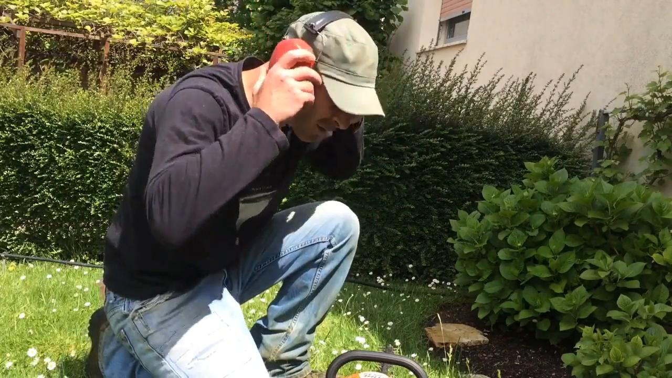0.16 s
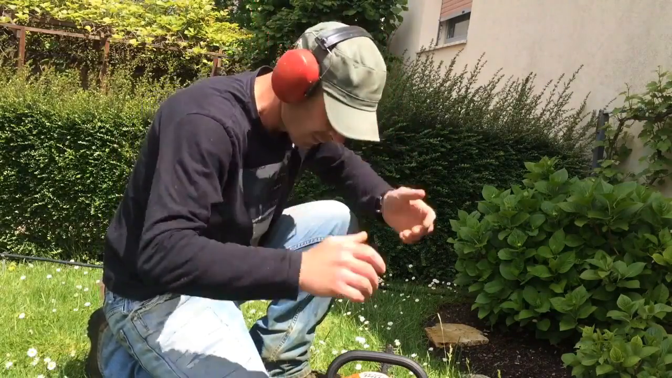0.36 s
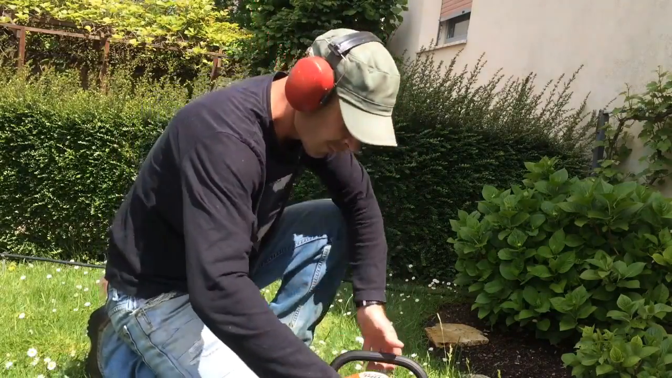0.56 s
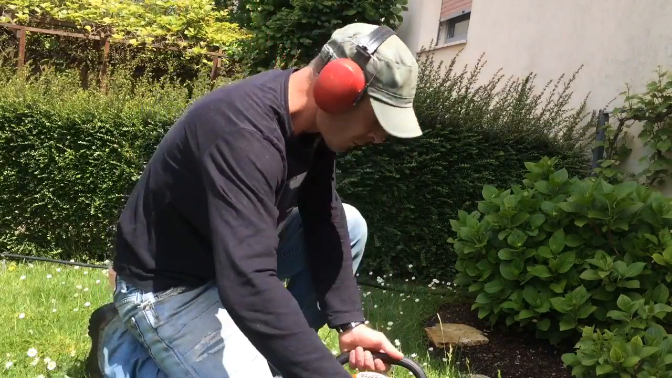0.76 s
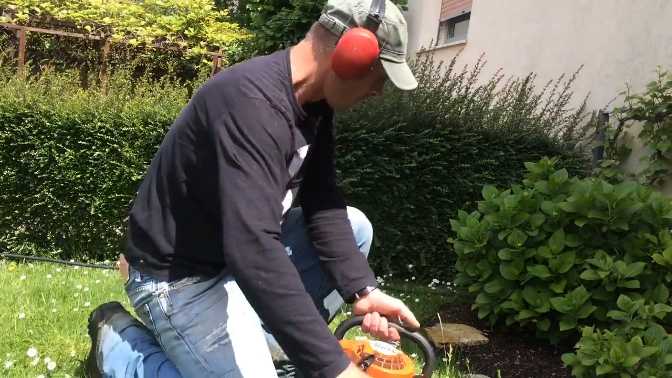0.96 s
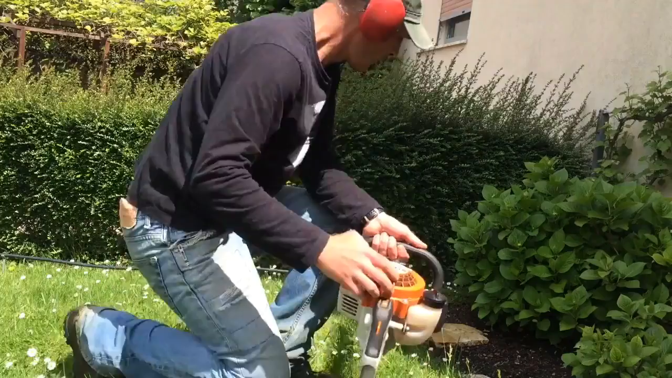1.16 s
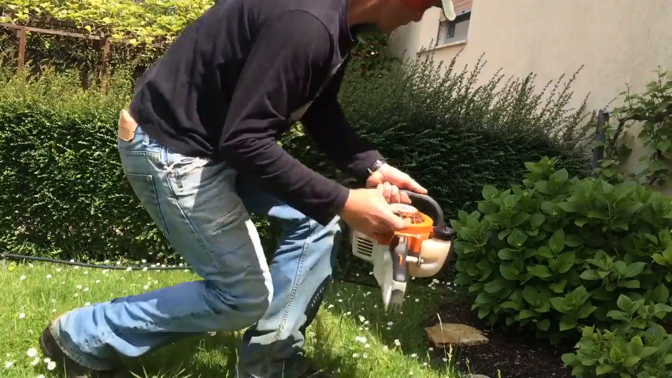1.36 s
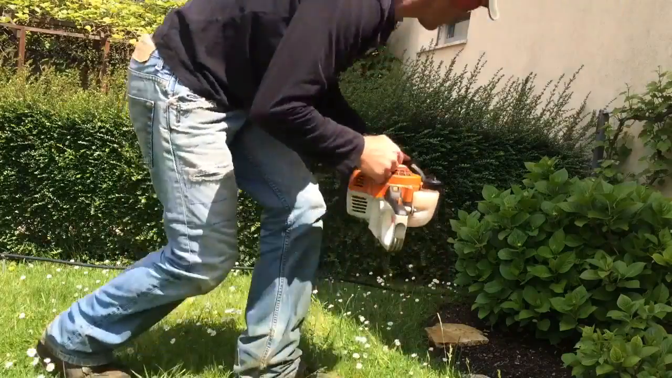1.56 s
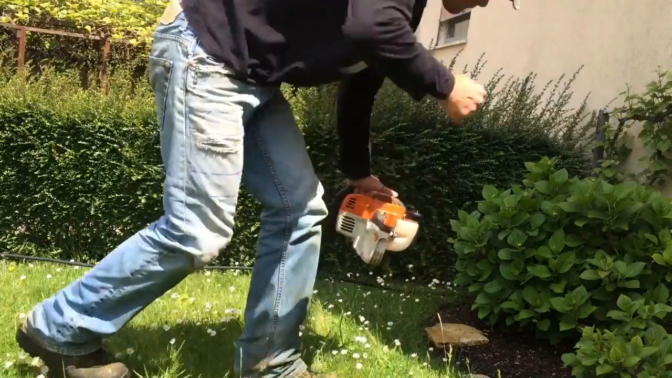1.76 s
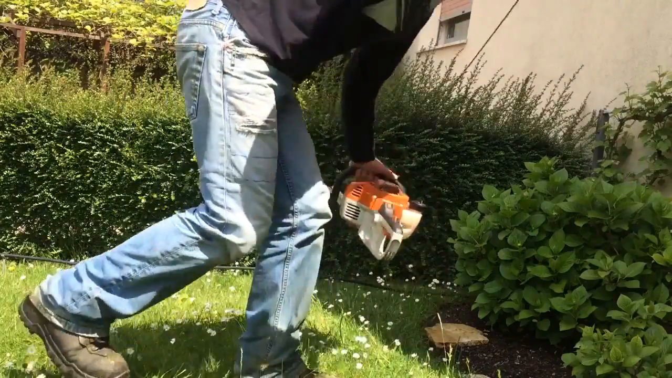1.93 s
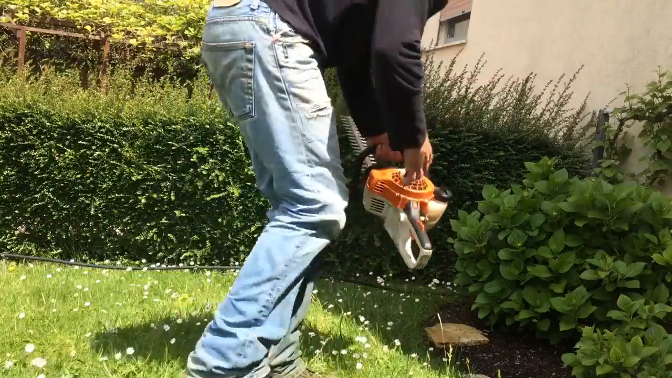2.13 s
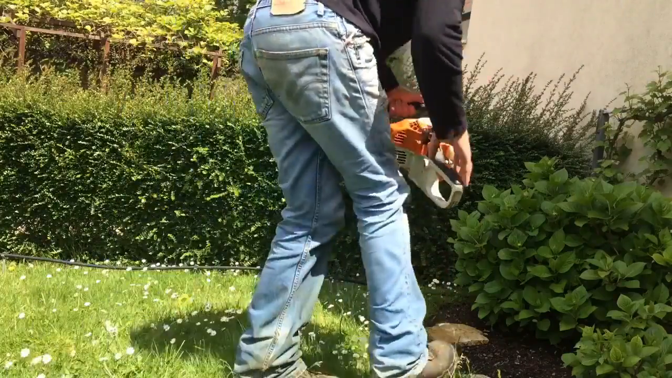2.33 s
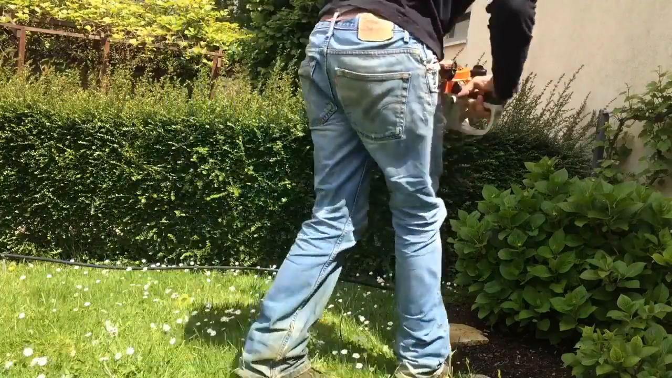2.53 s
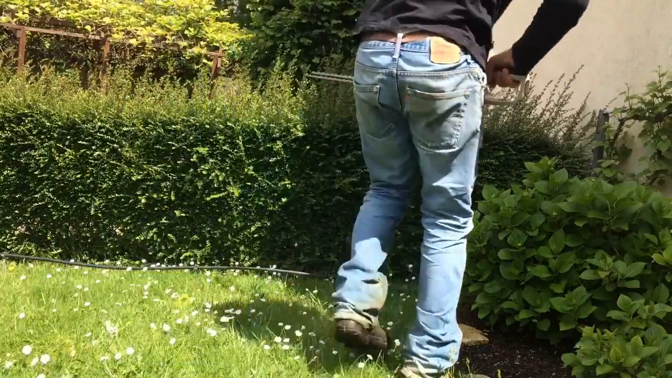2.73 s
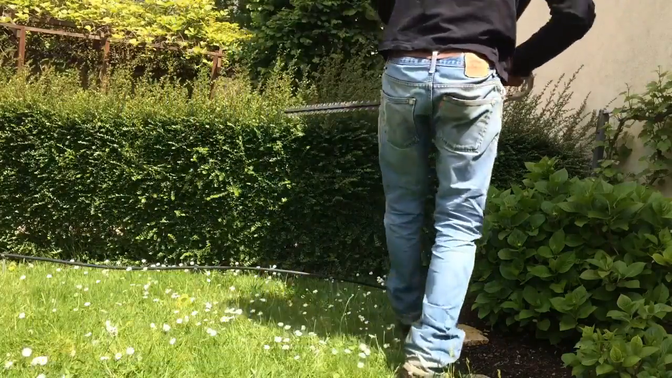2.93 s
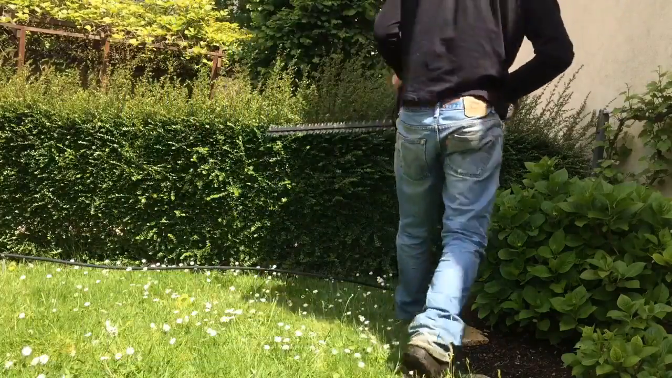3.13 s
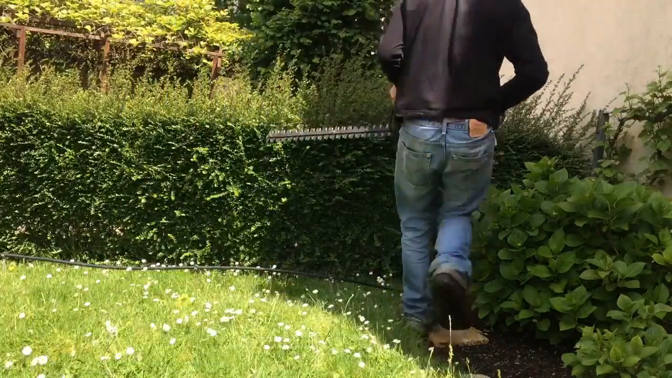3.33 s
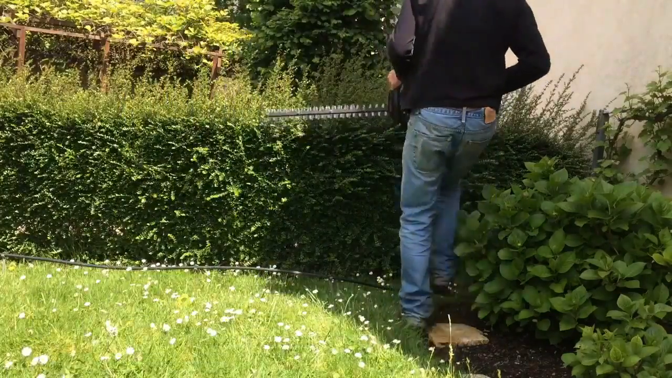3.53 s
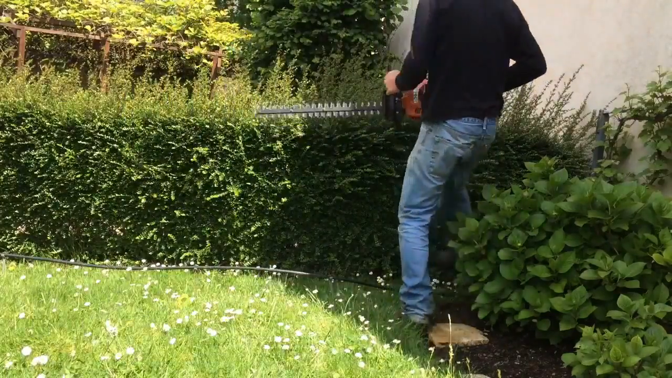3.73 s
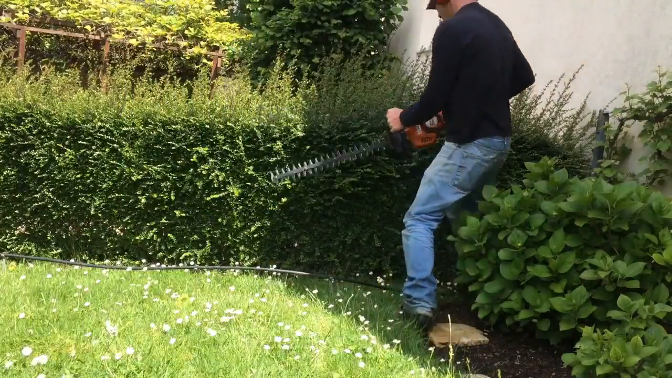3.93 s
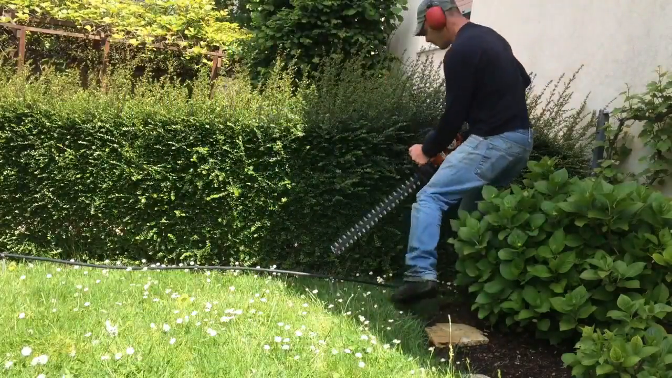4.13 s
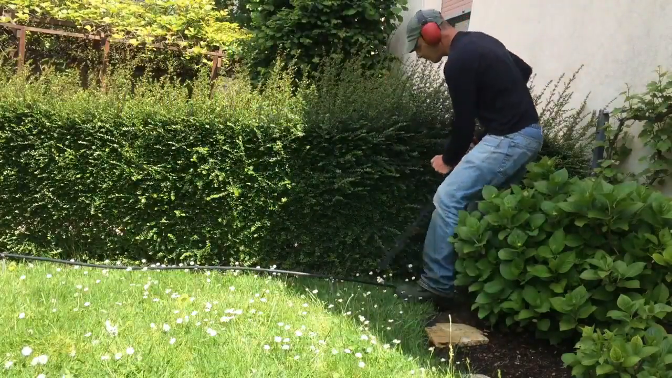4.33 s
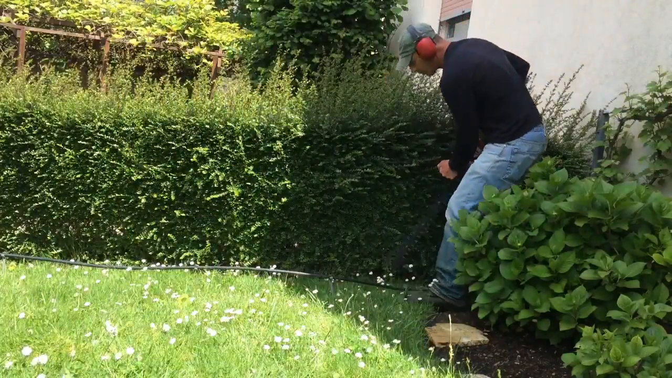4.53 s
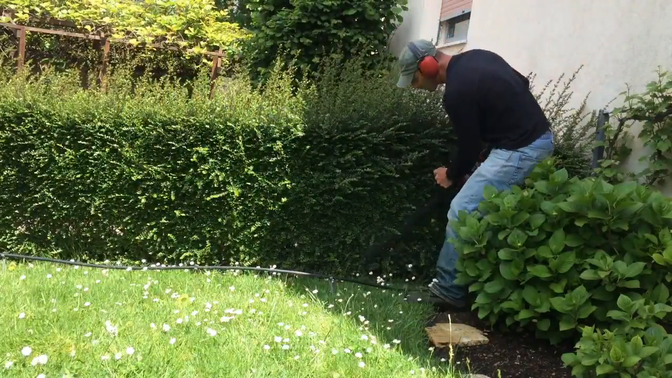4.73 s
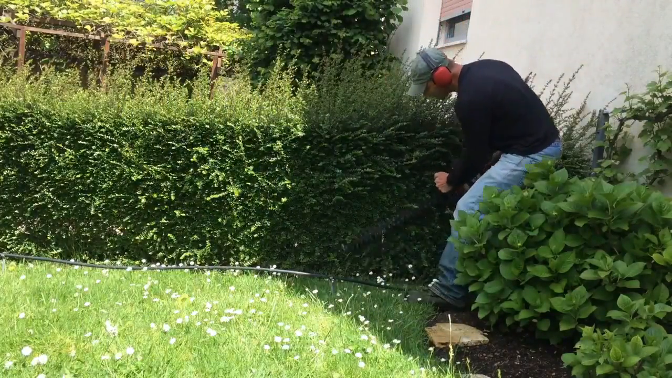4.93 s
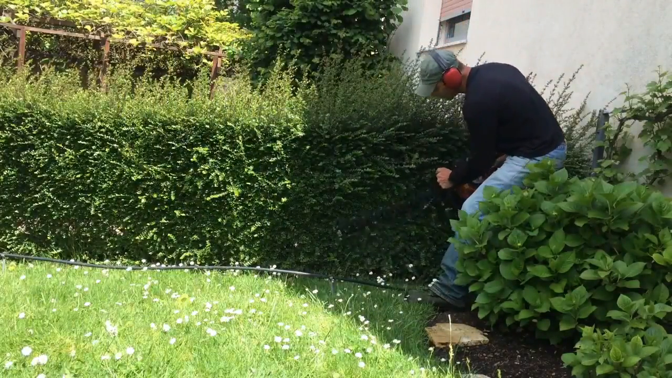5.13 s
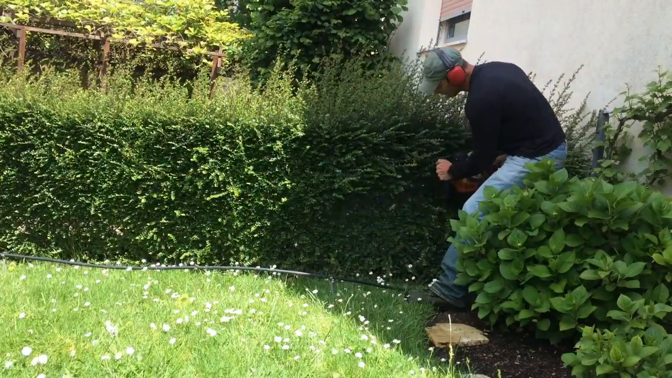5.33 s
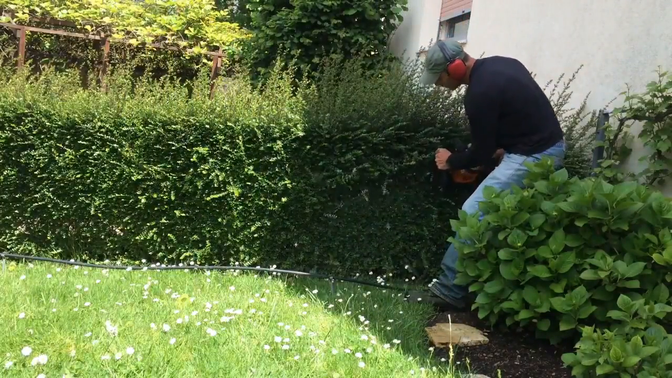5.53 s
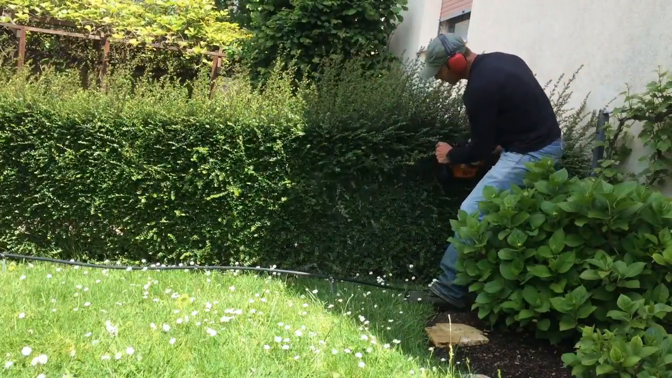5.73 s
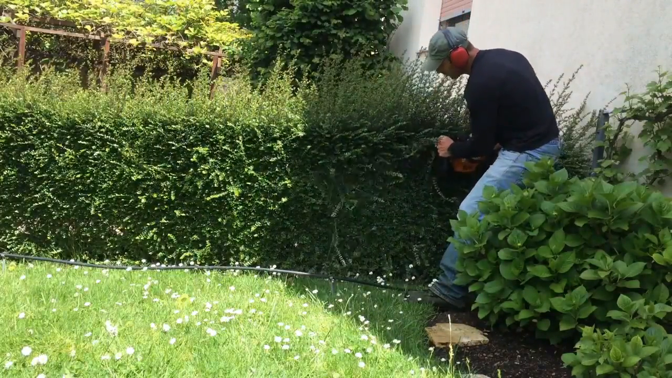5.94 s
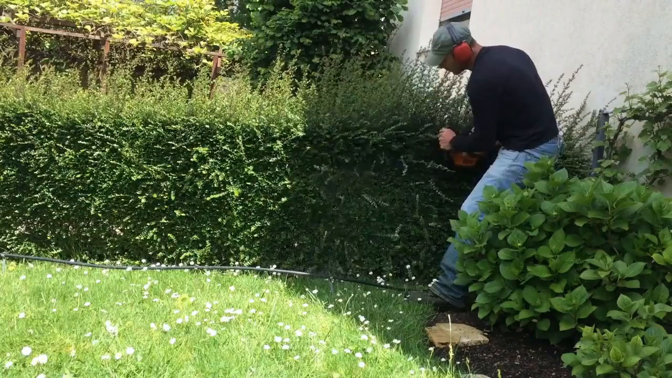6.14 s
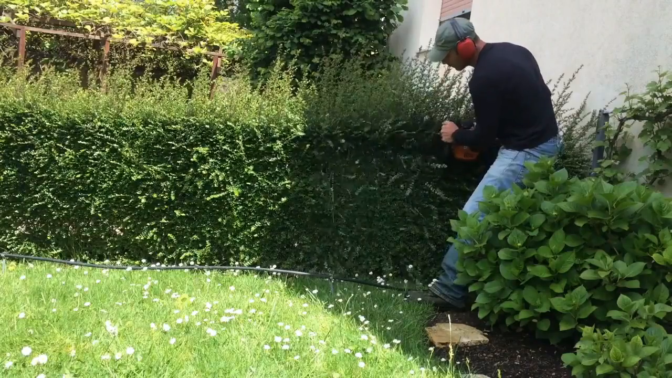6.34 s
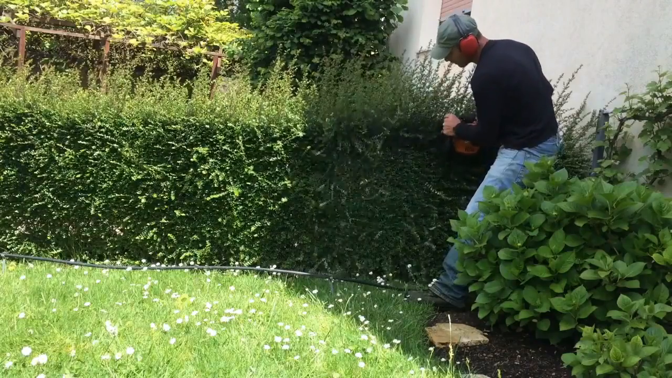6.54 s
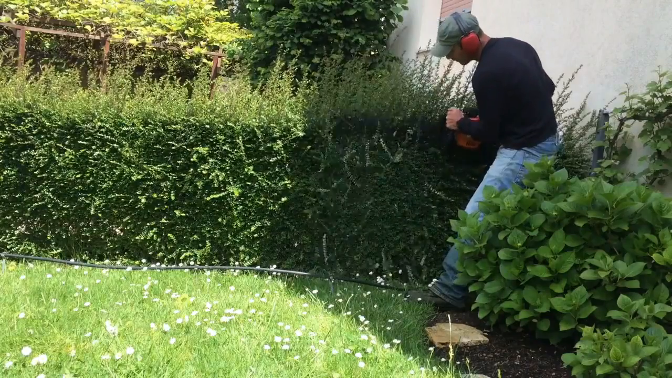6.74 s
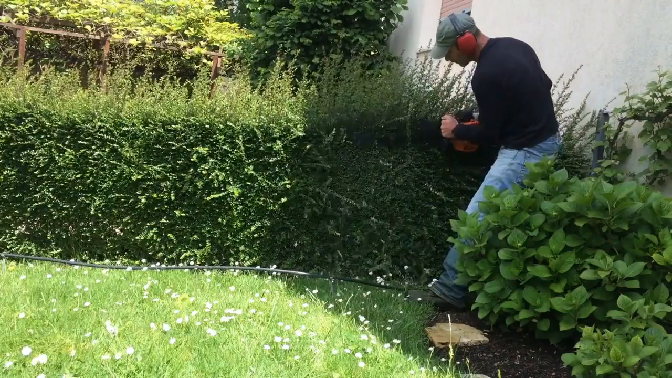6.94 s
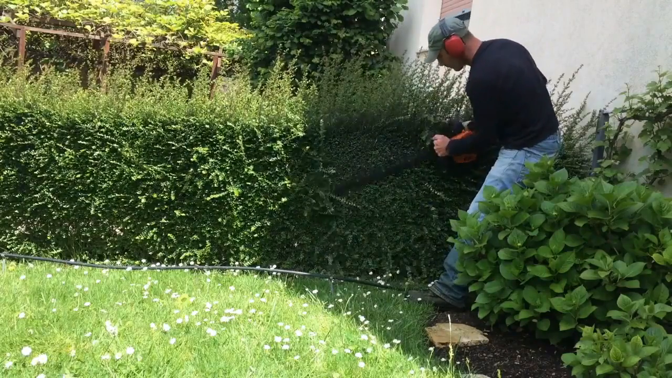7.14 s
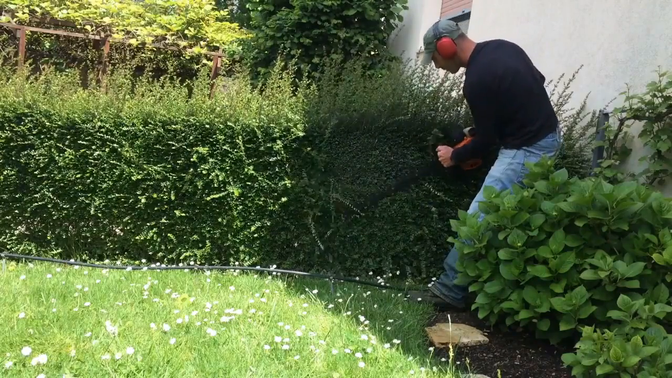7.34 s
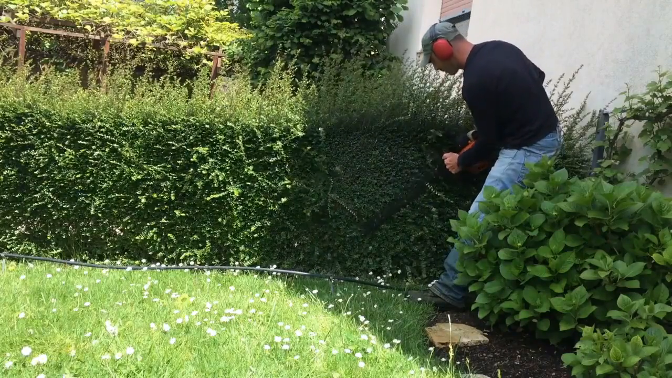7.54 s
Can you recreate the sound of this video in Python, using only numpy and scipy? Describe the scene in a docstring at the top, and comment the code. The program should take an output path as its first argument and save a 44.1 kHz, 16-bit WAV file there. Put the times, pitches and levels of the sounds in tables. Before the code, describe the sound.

The sound opens in a quiet garden with a faint low rumble. From about 0.7 seconds, clothes and grass rustle softly and a petrol hedge trimmer gives light knocks as it is picked up nearby, with a sharper one at 1.3 seconds. Around 1.8 seconds one quick, clattering pull starts the two-stroke engine. Several loud metallic clanks follow until 2.4 seconds. The engine idles lumpily, with low muffler thumps, uneven pops and rattling steel blades, and there is another knock at 4.4 seconds. At 4.5 seconds the throttle opens and the pitch climbs fast, reaching a loud, rasping drone just after 5 seconds. The blades clatter and sizzle along the hedge, with a thin metallic ring growing over them. At about 7 seconds the engine briefly drops in pitch and level, recovers by 7.4 seconds, and is still at full speed when the sound ends at 7.6 seconds.

```python
"""A two-stroke petrol hedge trimmer is picked up in a garden and started with one pull.
Its housing knocks, then it idles lumpily: each crank turn thumps the muffler and rattles the steel
blades, and about every fourth fires hard. It revs to full throttle, the crank's harmonics sweeping
through muffler and pipe resonances, and the blades clatter and sing along a hedge beside a house wall,
with one short dip in speed."""
import sys
import numpy as np
from scipy import signal
from scipy.fft import rfft, irfft, next_fast_len
from scipy.io import wavfile
from scipy.ndimage import uniform_filter1d

SR = 44100
rng = np.random.default_rng(int(sys.argv[2]) if len(sys.argv) > 2 else 0)


def master(y):
    """Save y as 16-bit WAV."""
    cut = np.clip(np.atleast_2d(y).T, -1, 1)
    pcm = np.round(cut * 32767)  # scale
    wavfile.write(sys.argv[1], SR, pcm.astype(np.int16))


N = 334719
TIME = np.arange(N) / SR


def amp(db):
    """Decibels to gain."""
    return np.exp(np.asarray(db) * np.log(10) / 20)


def unit(x):
    """Scales to rms 1."""
    return x / np.sqrt(np.mean(x ** 2) + 1e-20)


def eq_db(curve, hz):
    """An EQ curve's dB at any frequency."""
    f, db = np.transpose(curve)
    return np.interp(np.log(hz + 1), np.log(f + 1), db)


def colour(x, curve):
    """Minimum-phase EQ along a curve of (f/Hz, level/dB)."""
    db = np.maximum(eq_db(curve, abs(np.fft.fftfreq(8192, 1 / SR))), -100)
    response = np.exp(np.conj(signal.hilbert(np.log(amp(db)))))
    return signal.oaconvolve(x, np.fft.ifft(response).real[:4096])[:N]


def resonance(hz, centre_hz, width_hz):
    """Gain of a steep resonance."""
    return 1 / (1 + np.square((2 * (hz - centre_hz) / width_hz) ** 2))


def fader(rows, column, fade_s=0.012):
    """Gain along a dB curve, fading to silence outside it."""
    rows = np.array(rows)
    inside = np.clip(1 + np.minimum(TIME - rows[0, 0], rows[-1, 0] - TIME) / fade_s, 0, 1)
    return amp(np.interp(TIME, rows[:, 0], rows[:, column])) * inside


def wander(hz):
    """Random drift of rms 1, up to the given rate."""
    size = next_fast_len(N)
    lowpass = 1 / (1 + (np.fft.rfftfreq(size, 1 / SR) / hz) ** 4)
    return unit(irfft(rfft(rng.standard_normal(size)) * lowpass, size)[:N])


def grains(per_s, spread_db):
    """Random tiny impacts of uneven size."""
    size = amp(spread_db * np.minimum(rng.exponential(1, N), 4))
    return unit(size * rng.choice([-1., 1.], N) * (rng.random(N) < per_s / SR))


def strikes(times, sizes):
    """Single impulses at the given times."""
    out = np.zeros(N)
    np.add.at(out, np.clip(np.round(times * SR).astype(int), 0, N - 1), sizes)
    return out


def die_away(x, seconds):
    """Gives each impulse an exponential tail."""
    return signal.lfilter([1], [1, -np.exp(-1 / (seconds * SR))], x)


def delayed(x, seconds):
    """A moving delay line."""
    return np.interp(TIME - seconds, TIME, x)


# EQ of the outdoor bed: f/Hz, level/dB
AIR_EQ = [(12, -53), (20, -26), (59, -1), (101, -2.5), (133, -2.5), (259, -16), (1500, -31), (1630, -28.5),
          (3080, -36.5), (3640, -45), (3960, -38.5), (15500, -50)]
# EQ of clothes and grass: f/Hz, level/dB
RUSTLE_EQ = [(290, -29), (500, -5), (611, -11), (676, -8), (1250, -9), (2430, -10), (15500, -16)]
# their fader as the trimmer is lifted: t/s, level/dB
RUSTLE_FADER = [(0.0, -78.5), (0.736, -76), (0.932, -69), (1.24, -63), (1.586, -71), (1.798, -73),
                (1.85, -46)]

def garden():
    """A bed of low outdoor rumble, with cloth and grass rustling close by."""
    air = unit(colour(rng.standard_normal(N), AIR_EQ)) * amp(-60 + 0.5 * wander(24))
    rustle = unit(colour(grains(5000, 1.3), RUSTLE_EQ)) * amp(0.77 * wander(28))
    return air + rustle * fader(RUSTLE_FADER, column=1)


# resonances of the housing: f/Hz, width/Hz, level/dB
HOUSING_MODES = [(440, 440, -11), (1050, 170, 1.5), (1340, 410, 2), (1700, 900, -1.5), (2400, 260, -2),
                 (2760, 210, 1), (3780, 1470, -5), (5500, 1150, -6.5), (7200, 2300, -11),
                 (12000, 4700, -21.5)]
# hits of handle, starter, clutch and blade bar:
# t/s, relative level/dB, tilt/dB per octave, chatter t60/s, ring of the struck part/Hz
KNOCK_CUES = [(.131, -56, 6, .04, 3200), (.303, -56, 1, .05, 3200), (.690, -42.5, -6.5, .056, 2200),
              (0.804, -36.5, -4, .023, 2500), (0.825, -42, -2, .04, 2400), (.904, -28.5, 3.5, 0.022, 2570),
              (1.001, -50, -5, .03, 2400), (1.042, -43.5, -2, .04, 2350), (1.327, -18.5, -1.5, 0.016, 1420),
              (1.589, -48.5, 1, 0.14, 2300), (1.741, -32.5, -7.5, 0.064, 1000), (1.774, -46, 3, .06, 2400),
              (1.781, -26.5, -4, 0.11, 1050), (1.801, -28.5, -3.5, 0.088, 1050),
              (1.851, -19, 11, 0.16, 7100), (1.859, -8.5, -3, 0.16, 1550), (1.965, -9, 1, 0.61, 1060),
              (2.128, -14, 5, 0.059, 2400), (2.248, -12, 3, 0.34, 1100), (2.346, -3, 2, 0.11, 2100),
              (2.357, -11, 3, .04, 5400), (2.64, -18, 1, .03, 2400), (4.381, -18, 2.5, .14, 2490)]

def knocks():
    """A sharp contact and a short chatter ring the housing."""
    out, t = np.zeros(N), np.arange(8192) / SR
    hz = np.fft.rfftfreq(len(t), 1 / SR)
    body = sum((-1) ** k * amp(db) / (1 + 2j * (hz - f) / width)
               for k, (f, width, db) in enumerate(HOUSING_MODES))
    body *= hz ** 2 / (hz ** 2 + 450 ** 2)  # a small shell radiates little bass
    for start, db, tilt_db, t60, ring_hz in KNOCK_CUES:
        contact = np.exp(-t / 0.0038)
        chatter = min(t60 / 0.23, 1) * amp(-60 * t / t60)  # longer knocks chatter more
        tail = 0.023 * amp(-60 * t / 0.59)
        force = rng.standard_normal(len(t)) * (contact + chatter + tail)
        struck_part = 1 + 1.3 / (1 + 2j * (hz - ring_hz) / 300)
        tilt = amp(tilt_db * np.log2((hz + 300) / 2500))
        ring = irfft(rfft(force) * body * struck_part * tilt)
        at = round(start * SR)
        out[at:at + len(t)] += amp(db - 11.5) * ring / ring[:256].std()
    return out


# pops at which the idle stumbles and takes up its beat afresh: t/s, accent/dB
IDLE_POPS = [(1.91, -4), (1.965, -0.5), (2.044, -7), (2.406, -3), (2.636, -6.5), (2.724, -2), (2.871, -8),
             (3.506, -1), (3.836, -1), (4.103, -1.5), (4.252, 0), (4.32, -1.5), (4.406, -4), (4.495, 2)]
TURN_S, TURNS_PER_FIRING, FIRING_DB = .0205, 4, -3

def idle_turns():
    """The crank's even beat between pops: turn times, which fire hard, and their accents in dB."""
    rows = []
    for (start, pop_db), (end, _) in zip(IDLE_POPS, IDLE_POPS[1:]):
        count = round((end - start) / TURN_S)
        for k in range(count):
            hard = k % TURNS_PER_FIRING == 0 and k < count - 1
            rows.append((start + (end - start) * k / count, hard, FIRING_DB if k else pop_db))
    last_s, last_db = IDLE_POPS[-1]
    times, hard, accent_db = np.transpose(rows + [(last_s, True, last_db)])
    return times, hard > 0, accent_db


def lulls():
    """Ducks the rattle 2 dB as the engine misses just before its loudest pops."""
    gaps = [np.where(TIME < s, s - TIME, np.inf) for s, db in IDLE_POPS[:-1] if db > FIRING_DB + 1]
    return amp(-2 * sum(np.exp(-gap / .035) for gap in gaps))


# echo paths as the trimmer is lifted and carried to the wall: t/s, ground delay/ms, wall delay/ms
ECHO_DELAYS = [(1.9, 0.87, 7.7), (2.3, 0.79, 8), (2.65, 1.3, 7.4), (2.95, 1.5, 6.5), (3.4, 1.36, 4.82),
               (3.9, 0.77, 4.8), (4.5, 0.97, 3.8)]

def echo(x, surface):
    """One reflection off ground or wall, its delay moving with the trimmer."""
    when, ground_ms, wall_ms = np.transpose(ECHO_DELAYS)
    delay_ms = {"ground": ground_ms, "wall": wall_ms}[surface]
    return delayed(x, np.interp(TIME, when, delay_ms) / 1000)


# EQ of the idling muffler: f/Hz, level/dB
THUMP_EQ = [(30, -42), (60, -0.5), (100, -2.5), (140, -1), (190, 5.5), (250, -1), (350, -1), (450, -8.5),
            (700, -32), (2000, -34)]

def muffler_thumps(times, hard, running):
    """Each turn puffs through the muffler and slaps off the wall, over a soft noise bed."""
    puffs = colour(strikes(times, -amp(np.where(hard, 1.5, -1.5))), THUMP_EQ)
    thumps = puffs + .55 * echo(puffs, "wall")
    bed = unit(colour(rng.standard_normal(N), THUMP_EQ))
    return thumps / thumps[running].std() + amp(-9) * bed


# ringing modes of the steel blades: f/Hz, level/dB
BLADE_MODES = [(1040, -4.5), (1850, -1), (2190, -0.5), (2500, -2), (2710, -8.5), (3230, -0.5), (3780, -0.5),
               (4010, 1.5), (4370, 0), (4790, -1), (5480, 2), (6130, 2.5), (6950, 0), (7760, 0.5),
               (8300, -2.5), (9560, 4.5), (10000, 2.5), (11110, 5.5)]

def blade_tinks(per_s, width_hz, spread_db):
    """Each clash of the blades rings one mode; every mode is hit about per_s times a second."""
    t, out = np.arange(2500) / SR, np.zeros(N)
    for hz, db in BLADE_MODES:
        position, strength, chance = rng.random((1500, 3)).T
        sizes = amp(spread_db * np.minimum(-np.log(1 - strength), 4))
        lands = chance < per_s * N / SR / len(chance)
        ring = amp(db) * np.sin(2 * np.pi * hz * t) * np.exp(-np.pi * width_hz * t)
        out += signal.oaconvolve(strikes(position * N / SR, sizes * lands), ring)[:N]
    return unit(delayed(out, .0004 * wander(6)))  # the flexing blades drift in pitch


# EQ of the casing's midrange rattle: f/Hz, level/dB
CASING_EQ = [(240, -34.5), (400, 0), (550, -8.5), (760, -1.5), (1020, -0.5), (1380, -3.5), (1800, -2),
             (2400, -3), (2960, -5), (3200, -4), (4200, -17.5), (7000, -96)]
# EQ of the loose blades' bright jingle: f/Hz, level/dB
JINGLE_EQ = [(1650, -33), (2800, -17.5), (3210, -7.5), (3500, -7.5), (3920, -0.5), (4330, 0.5), (4690, -3),
             (5220, -1.5), (6420, -7.5), (6950, -2), (7570, -8), (9590, -8), (11800, -16), (14700, -14.5),
             (15500, -7.5)]

def rattle(times, jolt_db, running):
    """Each turn jolts the casing and the loose blades into a spray of tiny impacts."""
    shake = .6 + die_away(strikes(times + .001, amp(jolt_db)), .009)
    shake *= lulls() / np.sqrt(np.mean(shake[running] ** 2))
    ringing = amp(-7.5) * blade_tinks(per_s=35, width_hz=70, spread_db=2.5)
    casing = unit(colour(grains(5000, 3.0) + ringing, CASING_EQ))
    jingle = unit(colour(grains(2600, 2.6) + ringing, JINGLE_EQ))
    return (amp(-2) * casing + amp(-0.6) * jingle) * shake


# EQ of a hard firing: f/Hz, level/dB
CRACK_EQ = [(100, -30), (300, -9.5), (600, 1.5), (1000, -4.5), (2500, -2), (5000, -11), (15000, -13)]

def exhaust_cracks(times, accent_db):
    """A hard firing leaves the exhaust as a snappy burst of noise."""
    envelope = die_away(strikes(times, amp(accent_db)), 0.023)
    return unit(colour(rng.standard_normal(N), CRACK_EQ)) * envelope


# idle faders: t/s, thump level/dB, rattle and crack level/dB
IDLE_FADERS = [(1.89, -29, -40.5), (1.97, -31, -27.5), (2.2, -33.5, -29.5), (2.6, -33, -32),
               (2.72, -29.5, -30), (3.6, -32, -32), (4.05, -40, -29.5), (4.35, -36.5, -37), (4.5, -32, -34)]

def idle():
    """The lumpy idle: thumps, rattle and cracks locked to one stumbling crank."""
    times, hard, accent_db = idle_turns()
    fired = times[hard]
    running = (TIME > fired[0]) & (TIME < fired[-1])
    jolt_spread, jitter = rng.uniform(-1, 1, (2, len(times)))
    times = times + .0009 * jitter * ~hard  # weak turns come unevenly
    jolt_db = np.where(hard, accent_db + 1, -5 + 3 * jolt_spread)
    thumps = amp(-2.5) * muffler_thumps(times, hard, running)
    bite = rattle(times, jolt_db, running) + amp(6) * exhaust_cracks(fired, accent_db[hard])
    direct = thumps * fader(IDLE_FADERS, column=1) + bite * fader(IDLE_FADERS, column=2)
    # the lawn reflects only the lows, cutting a notch that moves with the trimmer's height
    return direct + .45 * echo(uniform_filter1d(direct, size=15), "ground")


# the trimmer dips to the hedge's foot, sweeps up through the twigs and comes down: t/s, height/0-1
SWEEP = [(4.5, 0.24), (4.78, 0.5), (4.88, 0), (5.25, 0.1), (5.7, 0.71), (6.9, 1), (7.28, 0.6), (7.44, 0.56),
         (7.59, 0.38)]

def height():
    """How high the trimmer is held, 0 to 1."""
    return np.interp(TIME, *np.transpose(SWEEP))


# the trigger is squeezed, and eased once: t/s, engine effort/dB
EFFORT = [(4.46, -20), (4.5, -3), (4.7, 1.5), (5.4, 0.5), (6.959, 0), (7.08, -5.5), (7.201, 0.5),
          (7.59, -0.5)]
# full-throttle mix by layer: level held low/dB, change at full height/dB, dB per dB of effort
LAYERS = {"boom": (0, -6.5, 1), "hum": (0, -3.5, 1.9), "lower pipe": (-24, -5.5, 0.74),
          "upper pipe": (-27.5, 0, 1), "roar": (-29.5, 0, 0.42), "clatter": (-25.5, 0, 0.46),
          "sizzle": (-27, -2.5, 0.47), "sing": (-29.5, 0, 0)}

def layer_gain(name):
    """A layer opens with the throttle, then rides on engine effort and the trimmer's height."""
    low_db, raised_db, per_effort = LAYERS[name]
    when, effort_db = np.transpose(EFFORT)
    opened = np.clip(1 + (TIME - when[0]) / 0.019, 0, 1)
    return opened * amp(low_db + raised_db * height() + per_effort * np.interp(TIME, when, effort_db))


# muffler response to the first crank order: f/Hz, level/dB
BOOM_EQ = [(60, -32), (86, -20.5), (122, -24), (137, -30), (146, -41), (154, -27), (159, -29), (161.5, -41),
           (166, -28)]
# muffler response for the hum, read at the second order: f/Hz, level/dB
HUM_EQ = [(120, -28), (200, -31.5), (290, -36.5), (320, -29.5), (338, -27)]

def muffler_drone(hz, angle, stroke):
    """The first crank order booms in the muffler; the next two hum, rocked by the blade stroke."""
    boom = np.cos(angle) * (1 + 0.092 * wander(90)) * amp(eq_db(BOOM_EQ, hz))
    hum = np.cos(2 * angle) + amp(7.5) * np.cos(3 * angle) * resonance(3 * hz, 305, 194)
    hum *= (1 + 0.39 * stroke + 0.17 * wander(94)) * amp(eq_db(HUM_EQ, 2 * hz))
    return amp(1.5) * boom * layer_gain("boom") + amp(0.7) * hum * layer_gain("hum")


# EQ of the exhaust pipe's rasp: f/Hz, level/dB
RASP_EQ = [(300, -7), (505, -12), (670, -7.5), (840, -42), (1010, -37), (1180, -4), (1350, -22),
           (1520, -16), (1850, -13), (2050, -14), (2400, -9.5), (2700, -9.5), (3200, -19.5), (5400, -14),
           (8000, -41)]

def pipe_bark(hz, angle, stroke):
    """Higher crank orders sweep through the pipe's resonances as the engine revs."""
    orders = {k: np.cos(k * angle + 2 * np.pi * rng.random()) for k in range(3, 36)}
    lower = sum(orders[k] * resonance(k * hz, 796, 125) for k in range(5, 13))
    lower *= layer_gain("lower pipe") * amp(38 * np.log2(hz / hz.max()))  # grows with speed
    upper = sum(orders[k] * resonance(k * hz, 962, 105) for k in range(5, 16))
    upper *= layer_gain("upper pipe") * (0.11 + height())
    rasp = sum(amp(eq_db(RASP_EQ, k * hz)) * orders[k] for k in orders) * layer_gain("roar")
    flutter = 1 + 0.12 * stroke + 0.15 * wander(61)
    bark = (amp(2) * lower + amp(1.5) * upper + amp(-2) * rasp) * flutter
    # raw middle orders while the engine pulls, fading out towards top speed
    pulling = np.clip((hz.max() - hz) / 30.2, 0, 1) ** 2 * (TIME > REVS[0][0])
    return bark + amp(-42) * sum(orders[k] for k in range(3, 9)) * pulling


# EQ of the rushing exhaust gas: f/Hz, level/dB
ROAR_EQ = [(200, -10), (400, -10), (560, -12), (700, 1.5), (820, 4.5), (1050, 2), (1400, 2), (1800, 1.5),
           (2300, -5), (4000, -40.5)]

def gas_roar(gate, surge):
    """Gas rushes out once a turn, and uneven burning rumbles underneath."""
    roar = unit(colour(rng.standard_normal(N) * gate * surge, ROAR_EQ))
    rumble_eq = [(25, -26), (55, -11), (80, 4), (105, 1.5), (140, -17), (270, 0), (500, -7.5),
                 (1500, -58)]
    rumble = unit(colour(rng.standard_normal(N), rumble_eq))
    return amp(1) * roar * layer_gain("roar") + amp(-36) * rumble * layer_gain("boom")


# EQ of the racing blades' clatter: f/Hz, level/dB
CLATTER_EQ = [(900, -25), (1700, -9.5), (2550, -2.5), (3250, -3), (3750, -1.5), (4250, -3.5), (4850, 1),
              (5450, -6), (5900, -20.5), (8000, -33)]
# EQ of their top-end sizzle: f/Hz, level/dB
SIZZLE_EQ = [(3500, -15.5), (5800, -0.5), (6500, -0.5), (9500, -3), (11000, -2.5), (13000, -5), (15300, -4)]

def blade_clatter(gate, surge):
    """Dense steel-on-steel impacts swell with each stroke."""
    steel = grains(9000, 2.2) + amp(-8) * blade_tinks(per_s=160, width_hz=60, spread_db=1)
    steel *= surge * gate ** .2
    clatter = unit(colour(steel, CLATTER_EQ)) * layer_gain("clatter")
    sizzle = unit(colour(steel, SIZZLE_EQ)) * layer_gain("sizzle")
    return amp(-1.5) * clatter + amp(0.67) * sizzle


def blade_sing(surge):
    """The blades sing in a narrow band, louder and higher among the upper twigs."""
    sing_eq = [(2000, -35), (2300, -9), (2440, -12), (2560, -1), (2700, -5), (2850, -26), (3300, -24)]
    sing = unit(colour(grains(2500, 4.0) * surge, sing_eq))
    pitch_ratio = 1 + .12 * (height() - .85)
    bent = np.interp(np.cumsum(pitch_ratio) / SR, TIME, sing)
    return bent * height() * layer_gain("sing")


# engine speed with the throttle open: t/s, crank rate/Hz
REVS = [(4.5, 60.4), (4.6, 95.6), (4.7, 122.5), (4.8, 146.7), (4.89, 154.7), (5.03, 161.3), (5.11, 167.2),
        (5.33, 168.9), (5.7, 168.2), (6.7, 168.6), (6.81, 169.4), (7.01, 167.5), (7.13, 149.7),
        (7.2, 152.9), (7.35, 167.5), (7.59, 169.8)]
TURNS_PER_STROKE = 6

def full_throttle():
    """One crank drives the exhaust and, geared down, the blades."""
    hz = np.interp(TIME, *np.transpose(REVS))
    turns = np.cumsum(hz) / SR
    stroke_angle = 2 * np.pi * turns / TURNS_PER_STROKE
    stroke = np.cos(stroke_angle)
    angle = 2 * np.pi * turns + .04 * np.sin(stroke_angle) + .035 * wander(60)
    exhaust = muffler_drone(hz, angle, stroke) + pipe_bark(hz, angle, stroke)
    gate = unit(.25 + np.exp(-(turns % 1) / .2))  # one gust a turn
    surge = 1 + 0.066 * stroke + 0.11 * wander(32)
    return exhaust + gas_roar(gate, surge) + blade_clatter(gate, surge) + blade_sing(surge)


def scatter(x):
    """A short reverb of sparse reflections from lawn, hedge and wall."""
    t = np.arange(SR // 4) / SR
    taps = rng.standard_normal(len(t)) * (rng.random(len(t)) < 2000 / SR)
    taps *= (t > .006) * amp(-60 * t / 0.091)  # pre-delay and decay
    wet = signal.oaconvolve(x, taps / np.linalg.norm(taps))[:N]
    return colour(wet, [(300, -17), (1200, 0.5), (2500, -7), (15000, 5.5)])


def scene():
    """The trimmer in its garden, the same in both ears."""
    trimmer = knocks() + idle() + full_throttle()
    return np.tile(trimmer + amp(-10) * scatter(trimmer) + garden(), (2, 1))


def record(dry):
    """A steep high cut at 15.4 kHz on the whole mix."""
    high_cut = signal.firwin(511, 15400, window=("kaiser", 9), fs=SR)
    return signal.oaconvolve(dry, high_cut[None], "same")


dry = scene()
out = record(dry)
master(out)
```